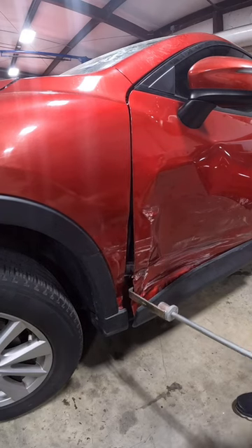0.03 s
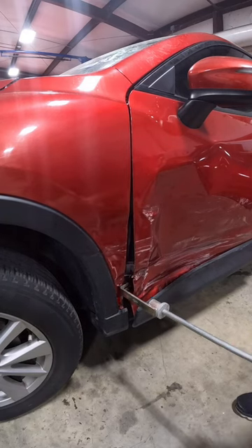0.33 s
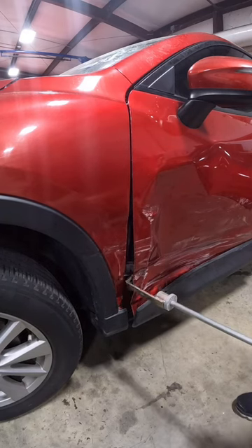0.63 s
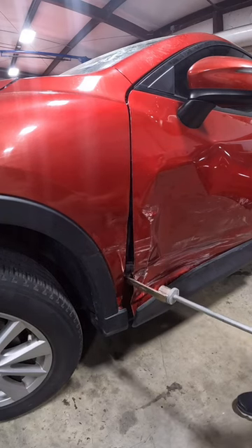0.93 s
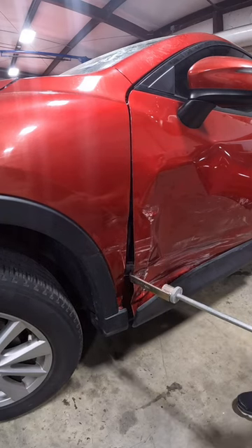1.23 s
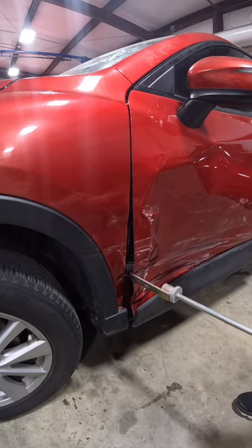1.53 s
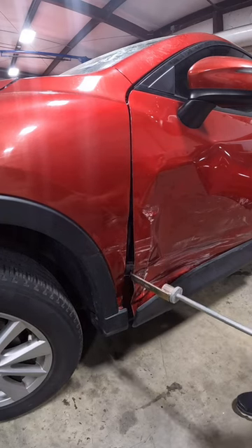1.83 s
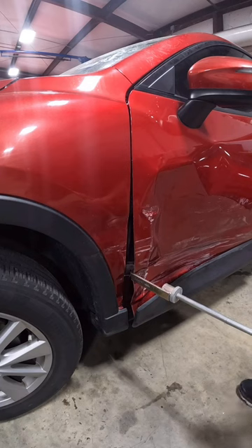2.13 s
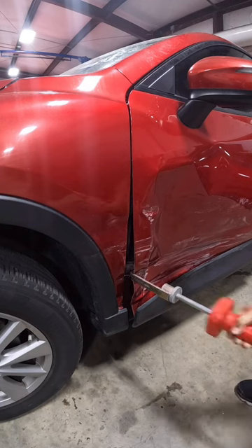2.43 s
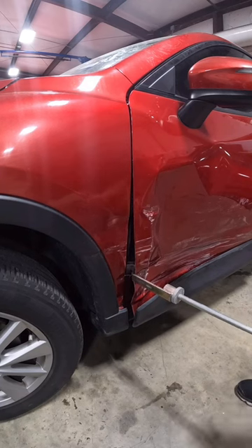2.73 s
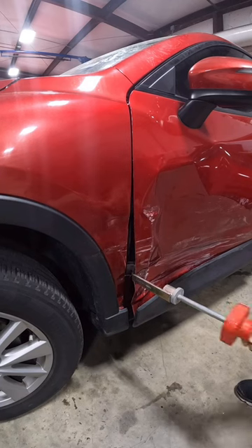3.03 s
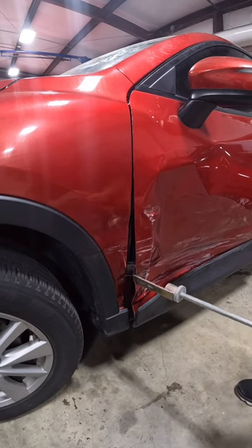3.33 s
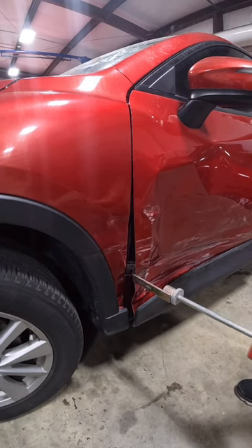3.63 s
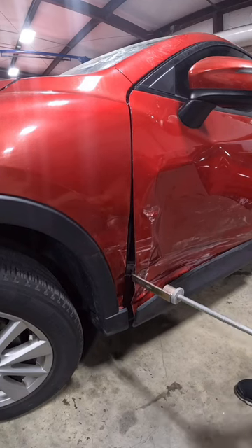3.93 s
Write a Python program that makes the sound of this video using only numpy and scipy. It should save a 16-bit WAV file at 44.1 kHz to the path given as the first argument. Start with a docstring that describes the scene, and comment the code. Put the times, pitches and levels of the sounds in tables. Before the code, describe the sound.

Three sharp steel blows from a slide hammer shake a car door in a slightly echoing workshop. Light clunks follow the first, and the weight scrapes back and forth before the other two, ending on a soft slide.

```python
"""A slide hammer pulls a dented car door in a workshop. It opens on a blow: the weight slams into its
stop, the steel rod rings and the door booms. For two seconds the hook clunks and pings in the door edge
while the rod is set. A sleeve brushes past, the door flexes, and the weight scrapes back and forth along
the rod, slamming home at 2.7 and 3.4 s before a last soft slide. Throughout, a limiter ducks each blow
and recovers over the hall's tail, and a low drone and a soft hiss lie underneath."""
import sys
import numpy as np
from scipy import signal
from scipy.fft import rfft, irfft
from scipy.io import wavfile
from scipy.ndimage import uniform_filter1d

SR = 44100
rng = np.random.default_rng(int(sys.argv[2]) if len(sys.argv) > 2 else 0)


def transcribe(signal):
    """Save signal, clipped to [-1, 1], as a 16-bit WAV file at the path in sys.argv[1]."""
    frames = np.atleast_2d(signal).T
    limited = np.clip(frames, -1, 1)
    pcm = np.round(limited * 32767).astype(np.int16)
    wavfile.write(sys.argv[1], SR, pcm)


N = 176400
T = np.arange(N) / SR

# The weight hits its stop. Each row: start in seconds, crack level in dB, crack t60 in seconds,
# then the relative levels of rod ring, hall send and door in dB.
BLOWS = [(0.0, 15.5, 0.002, -10, 6.5, 4.5), (2.6689, 10, 0.031, -6.5, 8, 6), (3.3995, 9, 0.033, -7, 7.5, 5)]
# Tone of the bright crack, the door skin's dense ring and the whole door's deep shudder.
# Each row: frequency in Hz, spectral level in dB.
CRACK_EQ = [(100, -23.5), (300, -4), (700, -5), (1400, -0.5), (2500, 6.5), (3700, 2), (5500, -2),
            (7500, -6.5), (11000, -15.5), (15500, -34)]
SKIN_EQ = [(60, -22.5), (130, -13.5), (180, 0), (250, -4), (350, -2), (480, -11), (620, -7.5), (800, -12.5),
           (1200, -12), (4000, -25), (10000, -56.5)]
BOOM_EQ = [(15, -21), (28, -8), (50, -3.5), (65, 0), (100, -0.5), (135, -3), (170, -8.5), (250, -10.5),
           (400, -20), (1500, -60)]
# The door's low notes. Each row: pitch in Hz, level in dB relative to the door's, t60 in seconds.
DOOR_MODES = [(46.07, -9.5, .45), (85.5, -18.5, 0.18), (122.9, -11, .42), (209.5, -19, 0.38),
              (247.4, -8, 0.18), (324, -16, .17), (501, -29.5, .3), (568, -27.5, 0.38)]


def blows():
    """Steel cracks on steel, the rod rings, and the jerk sets the door skin and its low modes going."""
    starts, crack_db, crack_t60, rod_db, _, door_db = np.transpose(BLOWS)
    cracks = sum(rattle(*hit) for hit in zip(starts, crack_db, crack_t60))
    out = shaped(cracks, CRACK_EQ)
    out += rod(rattle(starts, rod_db, t60=0.11))
    out += shaped(rattle(starts, door_db - 9, t60=0.16), SKIN_EQ)
    out += shaped(rattle(starts, door_db - 9, t60=0.35), BOOM_EQ)
    for k, (hz, db, t60) in enumerate(DOOR_MODES):
        out += (-1) ** k * ring(strikes(starts, door_db + db), hz, t60)
    return out


def blows_into_hall(boost_db=17.5):
    """Summed over all directions, a blow reaches the hall as one smooth bright click."""
    starts, _, _, _, send_db, _ = np.transpose(BLOWS)
    return shaped(strikes(starts, send_db + boost_db), CRACK_EQ)


# The rod's steely voice. Each row: pitch in Hz, bandwidth in Hz, relative level in dB.
ROD_MODES = [(583, 15, 10), (1029, 14, 6), (1091, 45, -1), (1439, 19, -9.5), (2414, 47, 1.5),
             (2661, 21, 4.5), (3420, 260, -12.5), (3660, 90, -10), (3763, 130, -14.5), (4000, 15, -22),
             (4243, 30, -18), (4430, 23, -11.5), (4400, 110, -14), (5100, 59, -19.5), (5340, 94, -15),
             (5725, 58, -14.5), (6500, 100, -31.5), (6480, 74, -26), (6710, 77, -18), (9200, 19, -35.5),
             (10540, 84, -26.5), (10200, 120, -35)]


def rod(drive, top_hz=11100):
    """The steel rod rings at its resonances; about unit power gain for white noise."""
    ringing = butter(resonate(drive, ROD_MODES), 8, top_hz, "low")
    impulse_response = resonate(signal.unit_impulse(SR // 2), ROD_MODES)
    return ringing / np.sqrt(np.sum(impulse_response ** 2))


# The hook knocks in the door edge. Each row: start in seconds, an unused peak level in dB,
# then the relative levels of thud, clank and tick in dB.
KNOCKS = [(0.164, -24, -44, -37, -35), (0.237, -33.5, -56, -38, -44.5), (0.286, -30, -54, -59, -35),
          (0.337, -40, -55, -62, -50), (0.362, -38, -57, -41, -65), (0.383, -36, -54, -57, -46),
          (0.406, -40, -71, -62, -43.5), (0.484, -38, -25, -34, -43), (0.696, -31, -46.5, -43, -68),
          (0.883, -26, -31, -29.5, -32.5), (0.961, -38, -36.5, -48, -46.5), (1.013, -21, -43, -27.5, -25),
          (1.093, -15, -27.5, -34, -47), (1.111, -21, -16.5, -23, -29.5), (1.129, -22, -15.5, -28, -39),
          (1.142, -15, -47, -45, -28), (1.223, -35.5, -49, -57, -45), (1.498, -20, -17, -30.5, -34.5),
          (1.51, -21, -24, -27, -32.5), (1.706, -31, -57, -40, -42.5), (1.756, -25, -41, -34, -62),
          (1.926, -28, -32, -29, -43.5), (1.946, -28, -48, -46, -60), (2.151, -27, -35, -30.5, -40.5),
          (2.351, -12, -18, -24.5, -53), (2.59, -12, -15, -29, -18.5), (2.944, -40, -36, -36, -37.5),
          (3.283, -28, -27.5, -38.5, -49)]
# Tone of a knock's low, middle and top layers. Each row: frequency in Hz, spectral level in dB.
THUD_EQ = [(30, -6), (60, -5.5), (120, 6.5), (175, -5), (250, 1), (400, -11), (600, -12.5), (1200, -27),
           (4000, -72)]
CLANK_EQ = [(200, -1), (450, 8), (1000, 3), (1700, -0.5), (2500, -6.5), (5000, -56), (12000, -77)]
TICK_EQ = [(900, -1.5), (2000, 4.5), (2500, 5), (3500, 3), (5200, -9), (7000, -13.5), (9000, -36),
           (10200, -21), (11500, -70), (16000, -58)]


def hook_knocks():
    """Each knock is a thud of the door, a clank of sheet, and a bright tick that sets the rod ringing."""
    starts, _, thud_db, clank_db, tick_db = np.transpose(KNOCKS)
    thud = shaped(rattle(starts, thud_db - 4, t60=0.16), THUD_EQ)
    clank = shaped(rattle(starts, clank_db - 3.5, t60=0.12), CLANK_EQ)
    tick = shaped(rattle(starts, tick_db - 4, t60=0.068), TICK_EQ)
    rod_ring = rod(rattle(starts, tick_db - 7, t60=0.068))
    return thud + clank + tick + rod_ring


# Small metallic accents. Each row: start in seconds, pitch in Hz, level in dB, t60 in seconds.
PINGS = [(0.166, 680, -31, 0.045), (0.24, 643, -34, 0.056), (0.338, 593, -36.5, 0.053),
         (0.361, 620, -41, 0.035), (0.485, 442, -30, 0.065), (0.881, 2450, -35, 0.092),
         (0.881, 9940, -61, 0.088), (1.143, 5130, -37.5, 0.072), (1.507, 5080, -44, 0.095),
         (2.349, 581, -18.5, 0.16), (2.349, 5660, -28.5, 0.044)]


def strain_pings():
    """The hook and the bent door edge ping under strain, one short tone at a time."""
    return sum(ring(strikes(start, db), hz, t60) for start, hz, db, t60 in PINGS)


# The weight's strokes, one list per pass, back and forward in turn.
# Each row: time in seconds, then the relative levels of body, rasp and treble in dB.
STROKES = [
    [(2.24, -44.5, -54.5, -56.5), (2.338, -33.5, -41.5, -55), (2.352, -27.5, -27, -43.5),
     (2.374, -26.5, -40.5, -49.5), (2.444, -32, -34.5, -45.5), (2.46, -29, -32, -53),
     (2.496, -41.5, -43.5, -57), (2.566, -34, -51.5, -64), (2.575, -47, -42, -56)],
    [(2.598, -46, -33, -30), (2.602, -28, -31.5, -39.5), (2.64, -24, -21, -33.5), (2.648, -26, -25, -33),
     (2.655, -22.5, -28, -36.5)],
    [(3.04, -104, -53, -53), (3.062, -43.5, -60, -67), (3.228, -39.5, -42, -59.5), (3.278, -43, -63, -70),
     (3.284, -44, -43, -58), (3.3, -59, -71, -78)],
    [(3.315, -58, -57, -65), (3.323, -55, -43, -61), (3.335, -35, -36.5, -50), (3.357, -34, -32, -47.5),
     (3.385, -34.5, -34.5, -45)],
    [(3.73, -60, -78, -70), (3.768, -43.5, -48.5, -69), (3.888, -42, -51, -59), (3.946, -47.5, -52.5, -69),
     (3.972, -62, -61, -73), (3.99, -47, -73, -79)],
]
# The scrape's body, rasp and treble. Each row: low edge in Hz, high edge in Hz, trim in dB.
SCRAPE_BANDS = [(248, 1220, -2), (1510, 4320, 0.5), (4780, 13500, -0.5)]


def weight_slides(catches_per_s=2500, spread_db=3.5, judder_per_s=40.7, fade_s=0.0095):
    """Tiny catches between weight and rod excite the rod; each band swells with the stroke and judders."""
    sizes = from_db(spread_db * np.minimum(rng.exponential(1, N), 4)) * rng.choice([-1, 1], N)
    judder_db = np.interp(T * judder_per_s, np.arange(1000), rng.standard_normal(1000))
    catches = sizes * (rng.random(N) < catches_per_s / SR) * from_db(judder_db)
    rub = from_db(-5.5) * rms_one(rod(catches)) + travelling_ring(catches)
    out = np.zeros(N)
    for stroke in STROKES:
        times, *curves = np.transpose(stroke)
        start, end = times[0], times[-1]
        moving = np.interp(T, [start - fade_s, start, end + fade_s, end + 2 * fade_s], [0, 1, 1, 0])
        for (low, high, trim_db), curve in zip(SCRAPE_BANDS, curves):
            band = rms_one(butter(rub, 4, [low, high], "band"))
            out += moving * band * from_db(np.interp(T, times, curve) + trim_db)
    return out


# Overall tone of the scrape's shifting ring. Each row: frequency in Hz, spectral level in dB.
SCRAPE_EQ = [(150, -8), (300, 12.5), (600, 2), (1200, 8), (2600, -3.5), (4200, -16), (5800, -16),
             (8000, -33.5), (10800, -41.5), (15000, -63)]


def travelling_ring(catches, sets=3, step_s=0.07):
    """The moving weight fades from one set of resonances into the next, in a cycle."""
    turn = np.pi * T / (sets * step_s)
    fades = [np.cos(turn + np.pi * k / sets) ** 4 for k in range(sets)]
    return colour(sum(resonate(catches, position_modes()) * fade for fade in fades), SCRAPE_EQ)


def position_modes(count=50):
    """Random narrow resonances for one position of the weight on the rod."""
    slots = np.arange(count) + rng.random(count)
    hz = np.interp(slots, [0, count * 0.6, count], [300, 4500, 14000])
    width_hz = 32 * np.sqrt(hz / 1000)
    db = 4 * np.clip(rng.standard_normal(count), -1.5, 1.5)
    return np.transpose([hz, width_hz, db])


# The door's rumble swells into the second blow. Each row: time in seconds, level in dB.
FLEX_LEVEL = [(2.25, -39), (2.36, -47), (2.45, -46), (2.52, -34), (2.6, -26), (2.67, -34), (2.72, -48)]


def door_flex():
    """The door flexes under the pull on the rod, rumbling with the tone of its thud."""
    return swell(THUD_EQ, FLEX_LEVEL)


# Tone of the cloth. Each row: frequency in Hz, spectral level in dB.
SLEEVE_EQ = [(500, 0), (2500, 4.5), (6000, -6.5), (11000, -17), (15000, -34)]
# One quick swish. Each row: time in seconds, level in dB.
SLEEVE_LEVEL = [(2.1, -75), (2.19, -45), (2.23, -42.5), (2.3, -75)]


def sleeve_brush():
    """A sleeve brushes past in a short breath of noise."""
    return swell(SLEEVE_EQ, SLEEVE_LEVEL)


# The hall hangs on longest in the lows. Each row: frequency in Hz, t60 in seconds.
HALL_T60 = [(60, 0.83), (250, 0.88), (1000, 0.38), (3000, 0.42), (6000, 0.62), (14000, 0.56)]
# Tone of the tail. Each row: frequency in Hz, relative level in dB.
HALL_EQ = [(50, -11), (300, -9), (1000, 1), (3000, -5), (5500, -8), (8500, -6.5), (10300, -7.5),
           (14000, -2.5)]


def hall(send, wet_db=-15, build_s=0.0056):
    """Reflections build into a diffuse tail that dies band by band."""
    t, tail = T[:SR], np.zeros(SR)
    edges = np.geomspace(30, 17000, 12)
    for low, high in zip(edges, edges[1:]):
        hz = np.sqrt(low * high)
        band = butter(rng.standard_normal(SR), 2, [low, high], "band")
        tail += band * from_db(at_hz(HALL_EQ, hz) - 60 * t / at_hz(HALL_T60, hz))
    tail *= 1 - np.exp(-t / build_s)
    return from_db(wet_db) * signal.fftconvolve(send, tail / np.sqrt(np.sum(tail ** 2)))[:N]


# Dark room tone with a soft hiss on top. Each row: frequency in Hz, spectral level in dB.
AIR_EQ = [(12, -39), (20, 6.5), (62, -5), (118, -2.5), (155, -30.5), (223, -17.5), (302, -32), (421, -30),
          (497, -24), (914, -30), (1140, -28), (2690, -33), (5240, -42), (10200, -67), (15000, -92)]
# The drone's low note and its octave. Each row: pitch in Hz, bandwidth in Hz, relative level in dB.
DRONE_MODES = [(54, 5.5, -6), (108.2, 10, -6.5)]
# Slow fader rides for air and drone. Each row: time in seconds, level in dB.
AIR_LEVEL = [(0, -43.5), (.6, -45.5), (1.0, -42), (1.35, -41), (1.7, -38), (2.15, -35.5), (2.7, -44.5),
             (3.2, -38), (4, -40.5)]
DRONE_LEVEL = [(0, -44), (.8, -47.5), (1.3, -37.5), (2.0, -37.5), (2.5, -36), (3.1, -44), (4, -44)]


def room_tone():
    """Workshop air and a wavering low drone."""
    air = colour(rng.standard_normal(N), AIR_EQ)
    drone = rms_one(resonate(rng.standard_normal(N), DRONE_MODES))
    return air * level(AIR_LEVEL) + drone * level(DRONE_LEVEL)


def strikes(times, db):
    """One click for each contact."""
    out = np.zeros(N)
    samples = np.clip(np.round(times * SR).astype(int), 0, N - 1)
    np.add.at(out, samples, from_db(db))
    return out + 1e-18


def rattle(times, db, t60):
    """Dense chatter that jumps at each contact and dies by 60 dB in t60 seconds."""
    envelope = signal.lfilter([1], [1, -from_db(-60 / (t60 * SR))], strikes(times, db))
    return rng.choice([-1, 1], N) * envelope


def ring(clicks, hz, t60):
    """A unit click sets a sine of height 1 ringing."""
    r, w = from_db(-60 / (t60 * SR)), 2 * np.pi * hz / SR
    return signal.lfilter([0, np.sin(w)], [1, -2 * r * np.cos(w), r * r], clicks)


def resonate(x, modes):
    """Parallel resonances, signs alternating."""
    out = 0
    for k, (hz, width_hz, db) in enumerate(modes):
        r = np.exp(-np.pi * width_hz / SR)
        poles = [1, -2 * r * np.cos(2 * np.pi * hz / SR), r * r]
        gain = (-1) ** k * from_db(db) * (1 - r * r) / 2
        out += gain * signal.lfilter([1, 0, -1], poles, x + 1e-18)
    return out


def shaped(x, eq, size=8192):
    """Minimum-phase EQ that keeps attacks sharp; unit power gain for white noise."""
    gain = rms_one(from_db(at_hz(eq, np.fft.rfftfreq(size, 1 / SR))))
    causal_fold = np.r_[1, np.full(size // 2 - 1, 2), 1, np.zeros(size // 2 - 1)]
    cepstrum = irfft(np.log(gain)) * causal_fold
    return signal.fftconvolve(x, irfft(np.exp(rfft(cepstrum))))[:N]


def colour(x, eq):
    """EQ for a steady sound; the result has unit power."""
    gain = from_db(at_hz(eq, np.fft.rfftfreq(N, 1 / SR)))
    return rms_one(irfft(rfft(x) * gain, N))


def swell(eq, curve):
    """Coloured noise that rides a level curve and is silent outside it."""
    gate = (T > curve[0][0]) * (T < curve[-1][0])
    return colour(rng.standard_normal(N), eq) * level(curve) * gate


def butter(x, order, hz, kind):
    """Low-, high- or band-pass with a flat passband."""
    return signal.sosfilt(signal.butter(order, hz, kind, fs=SR, output="sos"), x)


def level(curve):
    """Gain over time from points of seconds and dB."""
    return from_db(np.interp(T, *np.transpose(curve)))


def at_hz(points, hz):
    """Read a table on a log-frequency axis."""
    freqs, values = np.transpose(points)
    return np.interp(np.log(np.maximum(hz, 1)), np.log(freqs), values)


def from_db(db):
    """Decibels to gain."""
    return 10 ** (np.asarray(db) / 20)


def rms_one(x):
    """Scale to unit power."""
    return x / np.sqrt(np.mean(x ** 2) + 1e-20)


def scene(wide_above_hz=11500):
    """All the work sits in the centre; only the top of the hall's tail is wide."""
    work = hook_knocks() + strain_pings() + weight_slides() + door_flex() + sleeve_brush()
    send = work + blows_into_hall()
    side = from_db(-1) * butter(hall(send), 8, wide_above_hz, "high")
    centre = blows() + work + hall(send) + room_tone()
    return centre + side * [[1], [-1]]


def record(dry, threshold_db=-7, release_db_per_s=90, detect_s=0.0019, stopband_hz=16800):
    """A fast limiter keyed from the left channel, with steady recovery, rounded peaks and a cut top."""
    power = np.maximum(uniform_filter1d(dry[0] ** 2, int(detect_s * SR)), 1e-12)
    over_db = np.maximum(10 * np.log10(power) - threshold_db, 0)
    recovery_db = release_db_per_s * T
    duck_db = np.maximum.accumulate(over_db + recovery_db) - recovery_db
    limited = np.tanh(dry * from_db(-duck_db))
    return signal.sosfilt(signal.cheby2(12, 70, stopband_hz, fs=SR, output="sos"), limited)


dry = scene()
out = record(dry)
transcribe(out)
```